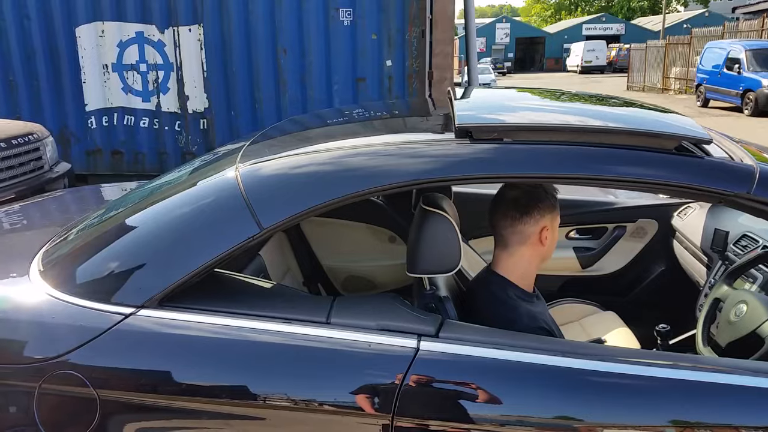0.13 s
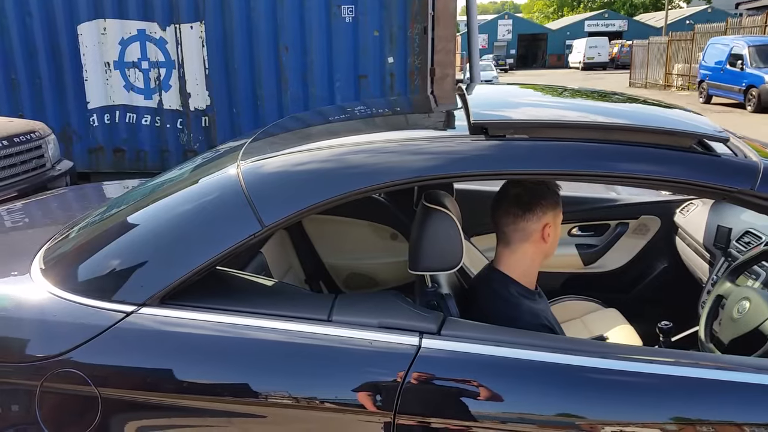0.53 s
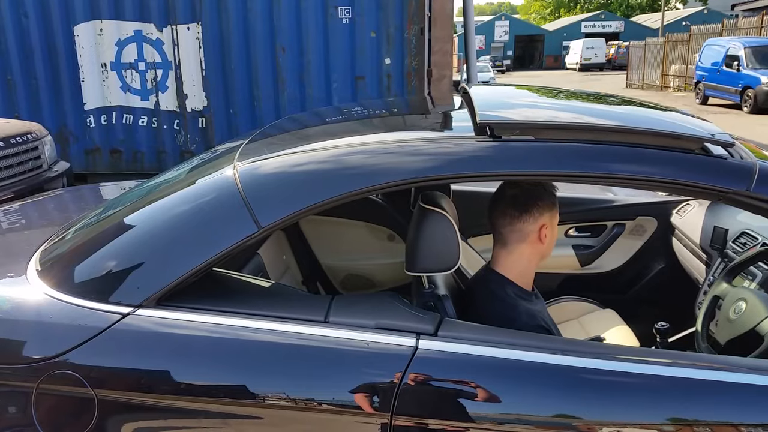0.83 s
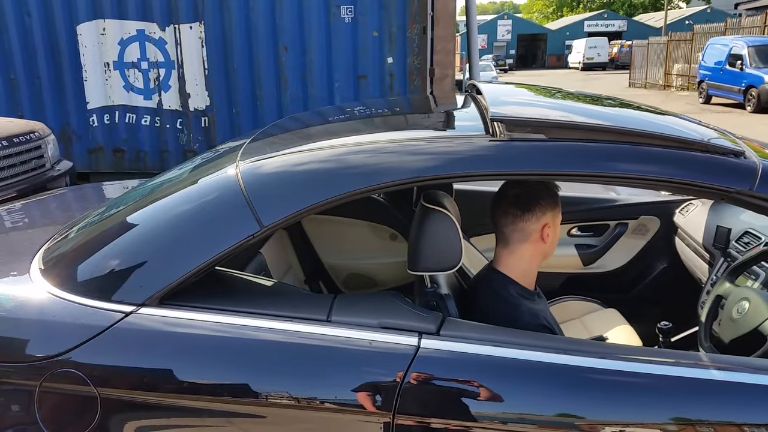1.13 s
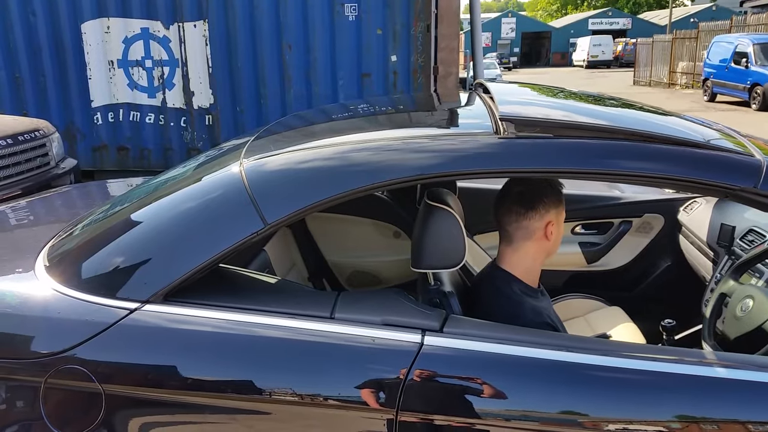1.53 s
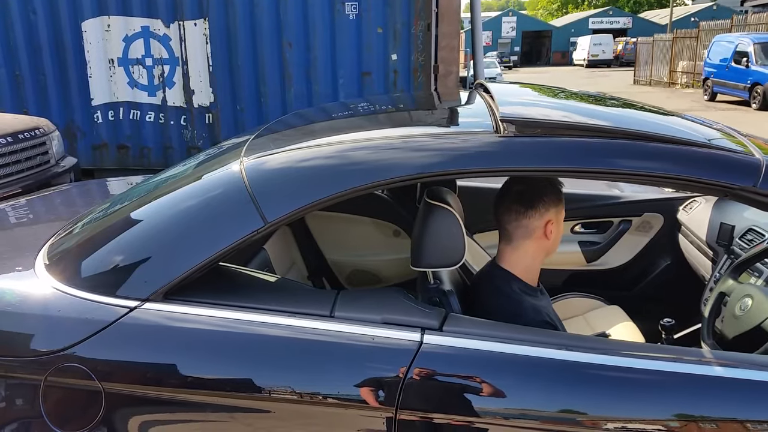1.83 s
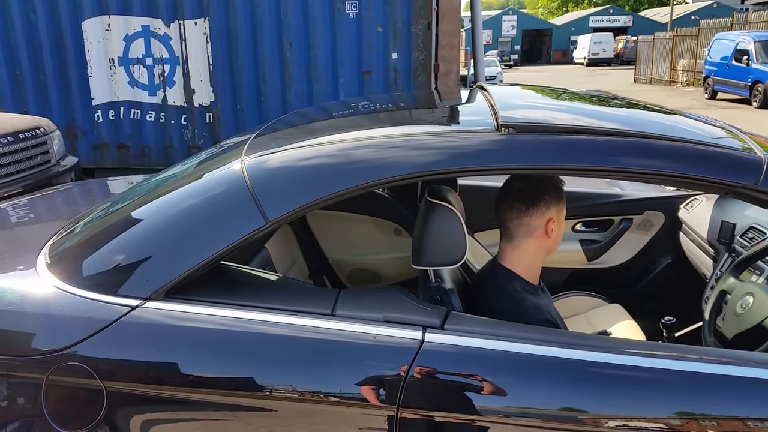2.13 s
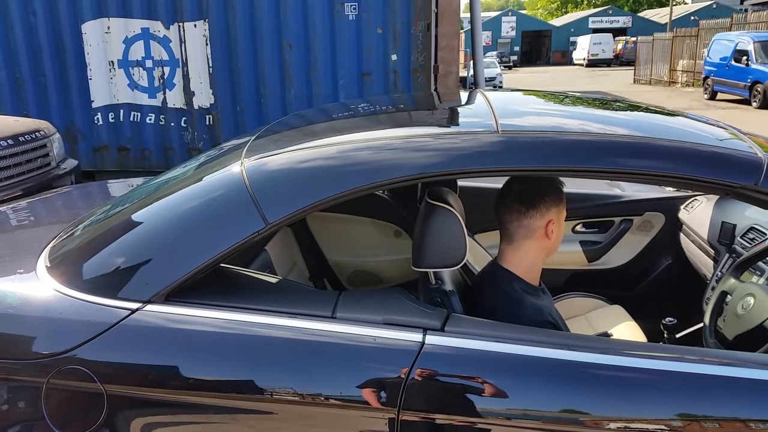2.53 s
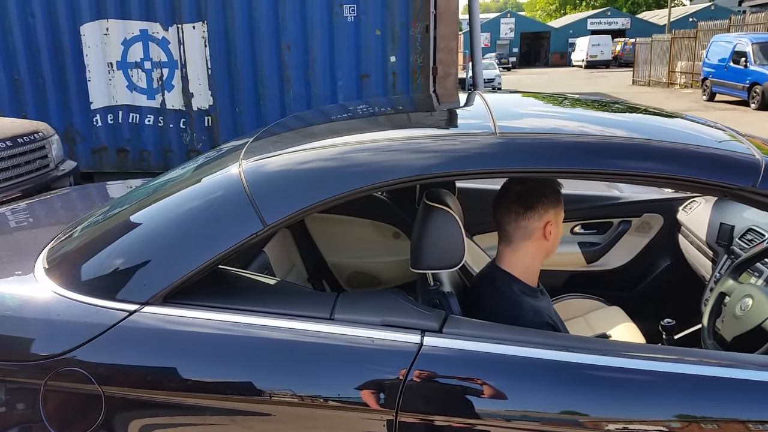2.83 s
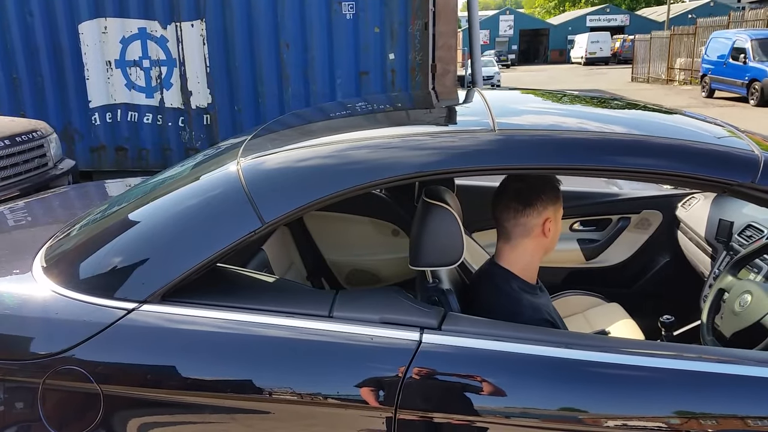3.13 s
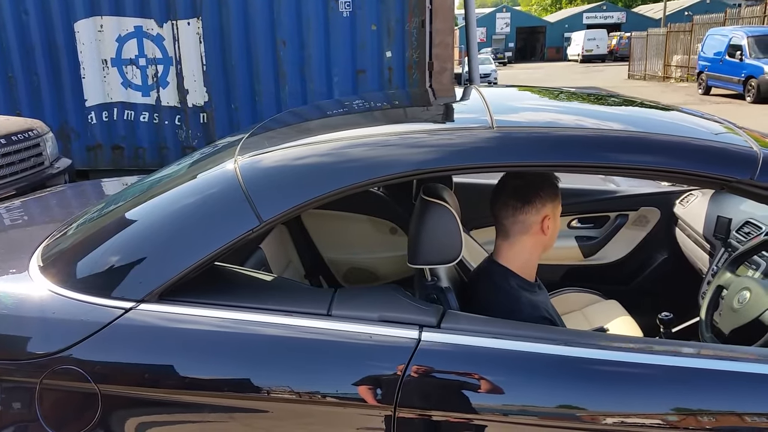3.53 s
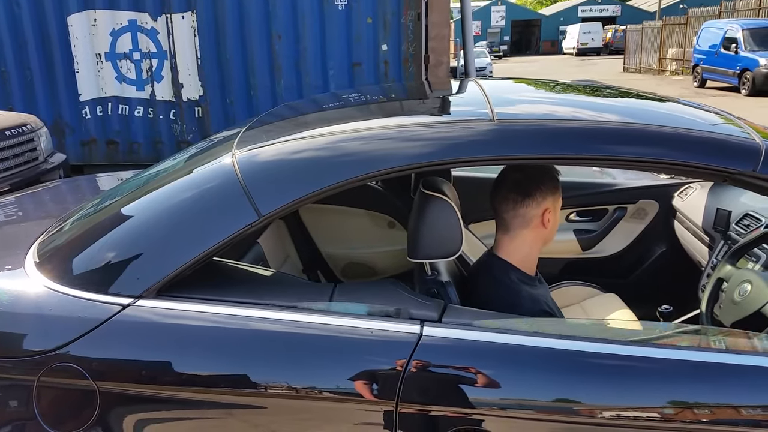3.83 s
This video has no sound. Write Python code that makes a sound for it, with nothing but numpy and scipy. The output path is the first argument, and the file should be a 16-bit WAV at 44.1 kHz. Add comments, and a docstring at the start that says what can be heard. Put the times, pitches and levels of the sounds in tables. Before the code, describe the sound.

A car roof panel slides shut outdoors: a very high, hissy motor whine with rubbing seals and small knocks stops early; steady machine hum continues, then hard wind buffets the stereo microphone and more knocks follow.

```python
"""A car roof panel slides shut in an open yard: a commutator motor whines and hisses at the very top,
seals rub and the linkage knocks and rumbles, until the motor stops near 1.35 s.
Hard wind gusts buffet the two microphone ports near the start and again from about 3.1 s.
Near the end come more knocks, and from 3.66 s a second motor runs up as a rising, unsteady tone.
Throughout, steady sine lines give the hum of machinery and shaped noise the outdoor wash."""
import sys
import numpy as np
from scipy import signal
from scipy.io import wavfile
from scipy.ndimage import uniform_filter1d, map_coordinates

SR = 44100
rng = np.random.default_rng(int(sys.argv[2]) if len(sys.argv) > 2 else 0)


def generate_wav(sig):
    """Save sig (samples, or channels by samples) to the path in sys.argv[1] as 16-bit PCM at SR."""
    pcm = np.round(np.clip(np.atleast_2d(sig).T, -1, 1) * 32767).astype(np.int16)
    wavfile.write(sys.argv[1], SR, pcm)


def voltage_ratio(level):
    """Linear amplitude factor for a level in decibels (scalar or array-like)."""
    return 10 ** (np.asarray(level, float) / 20)


N = 176400  # samples, 4 s
LAG_S = 17 / 44100  # later arrival at the left port


def evened(x):
    """Normalisation: scales a signal to rms 1."""
    return x / np.sqrt(np.mean(x ** 2) + 1e-20)


def read(points, hz):
    """Spectral envelope: interpolates a table on a log frequency axis."""
    f, value = np.transpose(points)
    return np.interp(np.log(hz + 1), np.log(f + 1), value)


def curve(rows, size=1):
    """Time envelope: interpolates one column of a table at every sample."""
    return np.interp(np.arange(N) / SR, np.array(rows)[:, 0], np.array(rows)[:, size])


def slow(count, per_s):
    """Random modulation: smooth curves of rms 1 through 2 * per_s random points a second."""
    points = rng.standard_normal((count, 200))
    position = np.arange(N) / SR * per_s * 2
    return np.array([evened(map_coordinates(p, [position], order=3, mode="wrap")) for p in points])


def noise(colour, same, patchy_db, size=1024):
    """Partial coherence: coloured noise of rms 1, part of it common to both ports but late at the left."""
    # phase given back to the left port, so that lows arrive more evenly: f/Hz, phase/rad
    phase_back = [(400, 1.13), (900, 1.1), (1300, 0.01)]
    hop = size // 4
    hz = np.fft.rfftfreq(size, 1 / SR)[:, None]
    a, b, c, d, patches = rng.standard_normal((N // hop + 5, len(hz), 5)).T
    patches = uniform_filter1d(patches, size=8, axis=0)  # over frequency
    patches = evened(uniform_filter1d(patches, size=8, axis=1))  # over time
    like = np.clip(same, -1, 1)
    common = a + 1j * b
    lead = read(phase_back, hz) * np.minimum(hz / phase_back[0][0], 1)
    left = common * np.exp(1j * (lead - 2 * np.pi * hz * LAG_S))
    right = like * common + np.sqrt(1 - like ** 2) * (c + 1j * d)
    z = np.array([left, right]) * voltage_ratio(colour(hz) + patchy_db * patches)
    return evened(signal.istft(z, nperseg=size, noverlap=size - hop)[1][:, :N])


def coloured(points):
    """Band limitation: a spectral envelope that drops by a further 80 dB outside its table."""
    return lambda hz: read(points, hz) - 80 * ((hz < points[0][0]) | (hz > points[-1][0]))


def sides(db):
    """Level difference between ports: the two gains for a left-minus-right lean in dB."""
    return voltage_ratio(np.array([db / 2, -db / 2]))


def tone(hz, db, lead=None):
    """Phase integration: a sine of given rms level; with no lead/rad it reaches the left port late."""
    turns = np.cumsum(hz) / SR + rng.random()
    lead = -hz * LAG_S if lead is None else lead / (2 * np.pi)
    return np.sqrt(2) * voltage_ratio(db) * np.sin(2 * np.pi * np.array([turns + lead, turns]))


def roof_motor():
    """Commutator harmonics: orders of one speed pass the casing response, with brush hiss and low orders."""
    # commutator frequency: t/s, f/Hz
    speed = [(0, 341), (.05, 338.1), (.09, 336.5), (.27, 341.3), (.45, 345.1), (.56, 346.8), (.61, 341),
             (.67, 318.6), (.71, 313.2), (.77, 310.4), (.87, 309.2), (1.03, 308.2), (1.29, 308.1),
             (1.36, 306)]
    # envelope of high orders and hiss: t/s, relative level/dB
    whine = [(0, -47.5), (.2, -51), (.3, -49.5), (.55, -49.5), (.63, -48.5), (.72, -51), (.85, -58.5),
             (1, -50), (1.33, -56.5), (1.37, -62), (1.45, -69), (1.55, -110)]
    # transmission of the casing: f/Hz, relative level/dB
    casing = [(11000, -30), (12200, -20), (12600, -7), (13000, -5), (13400, -6), (14000, 0), (14600, 0),
              (15200, -5), (15800, -18)]
    # spectrum of the brush hiss: f/Hz, relative level/dB
    brush = [(6470, -59), (11000, -23), (11900, -15), (12400, -13), (12500, -9.5), (14200, 6), (15000, 2),
             (15900, -13)]
    # envelope of the third order, shared by the fourth: t/s, relative level/dB
    third = [(0, -57), (.17, -58), (.25, -65), (.6, -62), (.68, -56), (.9, -57), (1.33, -58), (1.38, -90)]
    hz = curve(speed)
    orders = np.arange(35, 52)
    waver = slow(count=len(orders), per_s=5.)
    lines = 0
    for k, w in zip(orders, waver):
        strong_db = 5 * (k == 42)
        lines = lines + tone(k * hz, coloured(casing)(k * hz) + 2.5 * w + strong_db)
    # the faster the speed changes, the weaker the lines: 0.06 dB per Hz/s
    blur_db = .06 * uniform_filter1d(abs(np.gradient(hz)) * SR, size=2000)
    running = np.clip((1.345 - np.arange(N) / SR) / .02, 0, 1)  # lines fade over 20 ms
    top = voltage_ratio(-3 - blur_db) * running * evened(lines)
    top = top + voltage_ratio(-6.5) * noise(coloured(brush), .4, 1.2)
    low = tone(3 * hz, curve(third) - 3, -.5) + tone(4 * hz, curve(third) - 9)
    return voltage_ratio(curve(whine)) * sides(-3.5)[:, None] * top + sides(5.)[:, None] * low


def panel():
    """Friction noise: broad hiss of the panel rubbing on its seals, and a lower rumble of the linkage."""
    # envelope of the rubbing: t/s, level/dB
    rub = [(0.0, -74.5), (0.13, -73.5), (0.2, -68), (0.22, -75), (0.54, -67), (0.69, -73), (1.25, -70.5),
           (1.68, -79.5), (1.76, -73), (2.16, -84.5), (3.61, -77.5), (3.71, -75), (3.99, -76), (4.0, -79)]
    # spectrum of the rubbing: f/Hz, relative level/dB
    rub_colour = [(2940, -38.5), (5000, -5), (5700, -12.5), (6730, -6), (7430, -14), (8260, -1.5),
                  (10900, -12.5), (12000, 0), (15600, -32.5), (22000, -120)]
    # envelope of the rumble: t/s, relative level/dB
    rumble = [(0.0, -58), (0.24, -53), (1.7, -56), (2.31, -85), (3.24, -61), (3.61, -58), (3.81, -52.5),
              (4.0, -57)]
    # spectrum of the rumble: f/Hz, relative level/dB
    rumble_colour = [(200, -40), (400, -2), (1000, -5.5), (2000, -13.5), (3000, -18.5)]
    rubbing = voltage_ratio(curve(rub)) * noise(coloured(rub_colour), 0.23, 1.5, size=512)
    rumbling = voltage_ratio(curve(rumble) + 0.5) * noise(coloured(rumble_colour), 0.42, 1.5, size=512)
    return rubbing + rumbling


def knocks():
    """Modal excitation: short scraping bursts ring the linkage's decaying modes; a tick rides on top."""
    # knocks: t/s, upper ring relative level/dB, low body relative level/dB, tick level/dB, burst t60/s
    blows = [(.184, -39, -41, -70, .11), (.563, -43, -38, -76, .09), (.89, -47, -52, -66, .05),
             (1.012, -47, -50, -74, .05), (1.04, -41, -40, -62, .07), (1.232, -50, -54, -72, .05),
             (1.33, -50, -42, -76, .16), (3.628, -47, -43, -86, .14), (3.65, -44, -38, -84, .16),
             (3.68, -47, -40, -82, .12), (3.708, -48, -43, -80, .1), (3.735, -41, -43, -72, .11)]
    # modes of the linkage: f/Hz, relative level/dB, t60/s
    modes = [(300, 1, .04), (390, 0, .04), (520, -3, .03), (700, -3, .03), (950, 1, .03), (1100, 0, .03),
             (1330, -2, .025), (1550, 0, .035), (1760, -3, .035), (2050, -8, .025), (2400, -10, .02)]
    # spectrum of the tick: f/Hz, relative level/dB
    tick_colour = [(4500, -32), (6500, -4), (10000, -4), (14000, -23)]
    t = np.arange(8000) / SR
    env = np.zeros((3, N + 8000))  # upper ring, low body, tick
    for s, ring_db, low_db, tick_db, t60 in blows:
        shape = np.minimum(t / .005, 1) * voltage_ratio(-60 * t / max(t60, .01))  # 5 ms rise
        env[:, round(s * SR):][:, :8000] += voltage_ratio(np.array([[ring_db], [low_db], [tick_db]])) * shape
    scrape = noise(lambda hz: 0 * hz, .3, .5, size=512)
    out = env[2, :N] * noise(coloured(tick_colour), 0.57, 0.93, size=512)
    for e, upper in zip(env, (True, False)):
        ring = sum(voltage_ratio(db - 60 * t / t60) * np.sin(2 * np.pi * hz * t)
                   for hz, db, t60 in modes if (hz > 800) == upper)
        ring = ring[None] / np.linalg.norm(ring)
        out = out + signal.oaconvolve(e[:N] * scrape, ring, axes=1)[:, :N]
    return out


def second_motor():
    """Frequency modulation: one order runs up, roughened by random shaking of pitch and level."""
    # run-up: t/s, f/Hz, level/dB, both before the shaking
    run_up = [(3.66, 820, -80), (3.72, 890, -64), (3.8, 930, -60), (3.87, 950, -54), (4, 960, -52)]
    shake, waver = slow(count=2, per_s=25.)
    hz = curve(run_up) * (1 + .006 * shake)
    started = np.arange(N) > run_up[0][0] * SR
    return tone(hz, curve(run_up, size=2) + 2.8 * waver, -0.58) * started


def wind():
    """Turbulent pressure: lumpy low noise, nearly incoherent at the ports; hard gusts reach higher."""
    # envelope of the low noise: t/s, relative level/dB, left minus right/dB
    swell = [(0.0, -37, 6.5), (0.04, -32, 7), (0.08, -30, -14), (0.11, -48, -12.0), (0.13, -29.5, -19),
             (0.18, -40, 13), (0.24, -36.5, 1.5), (0.29, -41.5, 14), (0.43, -46, 13), (0.47, -45, 2.5),
             (0.5, -35, 8.5), (0.53, -41, 7), (0.62, -48, 5), (0.69, -52, -1), (0.75, -40, -14.5),
             (0.81, -50.5, 2.5), (0.88, -33, -3), (1.0, -40, -4), (1.06, -46, -10), (1.14, -48, 11),
             (1.19, -50.5, -6), (1.39, -44.5, 0.5), (1.65, -53, -4), (1.7, -42, 14), (1.74, -48, -3),
             (2.22, -65, 1), (2.85, -44, 8), (2.91, -51, -13), (2.97, -35.5, 8.5), (3.01, -58, 4),
             (3.05, -46, 16), (3.07, -54, -2), (3.09, -32, -22.5), (3.14, -15.5, 8.5), (3.17, -25.5, -8),
             (3.21, -19, 7.0), (3.24, -28, -6), (3.27, -15, -0.5), (3.3, -39.5, -10), (3.33, -28, 4),
             (3.38, -33.5, -5), (3.42, -26, 7.5), (3.45, -41, 0.5), (3.51, -26.5, -5), (3.53, -36.5, -9),
             (3.55, -33, -1), (3.58, -28.5, 5.5), (3.62, -41, 15.5), (3.64, -35, 3.5), (3.71, -29, 14),
             (3.75, -36, 2), (3.8, -28.5, -5), (3.85, -36, -1), (3.89, -35.5, 3.5), (3.95, -36.5, -6),
             (4.0, -43, 7.5)]
    # spectrum of the low noise: f/Hz, relative level/dB
    low_colour = [(20, -11), (45, -3), (70, -2), (100, 0), (140, -6), (170, -6), (240, -20), (400, -36),
                  (600, -60)]
    # hard gusts, one table each: t/s, level before smoothing/dB, left minus right/dB
    gusts = [
        [(0.02, -64, -1), (0.032, -49, 3.0), (0.046, -60, -2.0), (0.07, -43, -16), (0.08, -58, -5),
         (0.09, -60, -5), (0.102, -61, -3.0), (0.122, -48, -5.0), (0.156, -59, -1), (0.16, -58, 3.5)],
        [(3.07, -63, -8), (3.086, -34.5, -16.5), (3.146, -37, 3), (3.186, -59, 3), (3.218, -30, -14),
         (3.232, -38, -15), (3.262, -35.5, -8), (3.31, -75, -1.0)],
    ]
    # spectrum of the hard gusts: f/Hz, relative level/dB
    gust_colour = [(150, -20), (220, 0), (350, -6), (500, -15), (620, -30), (800, -60)]
    t = np.arange(N) / SR
    half = np.array([[.5], [-.5]])
    db = curve(swell) + half * curve(swell, size=2) + 2.64
    low = noise(coloured(low_colour), 0.15, 2.4, size=2048)
    # partly flatten the noise's own swells, so that the table sets the lumps
    low = evened(low / uniform_filter1d(low ** 2, size=1600, axis=1) ** .35)
    hard = 0
    for g in gusts:
        blowing = (t > g[0][0]) * (t < g[-1][0])
        hard = hard + voltage_ratio(curve(g) + half * curve(g, size=2)) * blowing
    high = uniform_filter1d(hard, size=200, axis=1) * noise(coloured(gust_colour), 0.03, 0.4)
    return voltage_ratio(db + 1.48 * slow(count=2, per_s=18.)) * low + high


def hum():
    """Line spectrum: steady sines of machinery that waver a little in level and pitch."""
    # lines: f/Hz, level/dB, left minus right/dB, phase lead of the left port/rad
    lines = [(191.5, -57, 0, 0), (296.1, -55, 6, .3), (383.6, -56.5, 2, -.2), (432, -68, 1, -1.1),
             (531.6, -65, 6, 2.6), (580.1, -60, 0, -1.4), (623.1, -74, 2, -.1), (671.6, -66, -1, -1.4),
             (720, -70, -5, -.5), (768.5, -70, 3, .4), (864, -57.5, 2, -1.1), (912.5, -65.5, 8, -.5),
             (1013.4, -69, 8, -2.2), (1152, -74, 6, 2.6), (1187, -73, 12, 2.4), (1391.6, -77, 0, 1.3),
             (1440, -72, 6, 2.7), (1488.5, -72, 5, 2.8), (1584, -78, 2, 2.9), (2102.2, -85, -10, -.7),
             (2308.1, -76, -12, 1.3), (2656.7, -85, 4, .7), (2921.8, -84, 6, 3)]
    # lines that waver more: f/Hz to rms level waver/dB
    restless = {296.1: 2.5, 912.5: 4, 2308.1: 3.5, 1013.4: 3}
    waver = slow(count=len(lines), per_s=6.)
    drift = slow(count=len(lines), per_s=2.014)
    out = 0
    for (hz, db, pan, lead), w, d in zip(lines, waver, drift):
        line = tone(hz * (1 + .0007 * d), db + restless.get(hz, 1.5) * w, lead)
        out = out + sides(pan)[:, None] * line
    return out


def wash():
    """Diffuse background: outdoor air and far machinery as noise whose coherence varies with frequency."""
    # spectrum: f/Hz, relative level per Hz/dB
    air = [(18, -32), (40, 7), (60, 2), (170, -7), (232, -4), (300, -6.5), (400, -10), (500, -17),
           (800, -18.5), (950, -19), (1280, -28), (1500, -24.5), (2300, -24.5), (2900, -26.5),
           (3300, -25.5), (3750, -15.5), (4200, -24), (4650, -29.5), (5200, -57.5), (6860, -72),
           (11000, -50.5), (15900, -37)]
    # lean of the spectrum: f/Hz, left minus right/dB
    lean = [(60, 6), (99, -1), (160, -4), (270, 1.5), (450, 3), (740, -2.5), (1220, 12.5), (2010, -2.5),
            (3330, 4.5), (5500, 19), (9080, 9.5), (15000, 7.5)]
    # coherence between the ports: f/Hz, likeness (0 to 1)
    likeness = [(60, 0.75), (120, 1), (170, 1), (400, 0.98), (520, 0.25), (850, 0.95), (1300, 0.13),
                (1800, 0.19), (2700, 0.23), (4000, 0.11), (15000, .12)]
    half = np.array([.5, -.5])[:, None, None]
    same = read(likeness, np.fft.rfftfreq(2048, 1 / SR)[:, None])
    return voltage_ratio(-45.5) * noise(lambda hz: read(air, hz) + half * read(lean, hz), same, 0.92, size=2048)


def scene():
    """Superposition: the pressures of all sources add."""
    return roof_motor() + panel() + knocks() + second_motor() + wind() + hum() + wash()


def roll_off(x):
    """The treble ends steeply here."""
    return signal.sosfilt(signal.butter(12, 16210, fs=SR, output="sos"), x)


def record(dry):
    """Linear filtering: the microphone's low cut at 45 Hz and band limit at 15790 Hz."""
    low_cut = signal.butter(2, 45, "high", fs=SR, output="sos")
    band_limit = signal.firwin(1023, 15790, window=("kaiser", 9), fs=SR)
    mix = signal.sosfilt(low_cut, dry)
    mix = signal.oaconvolve(mix, band_limit[None], "same")
    return roll_off(mix)


dry = scene()
out = record(dry)
generate_wav(out)
```